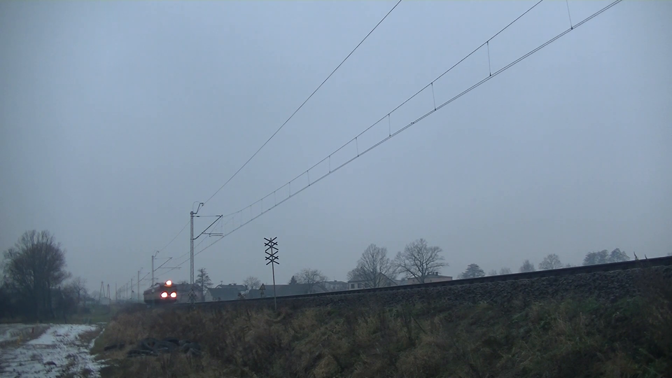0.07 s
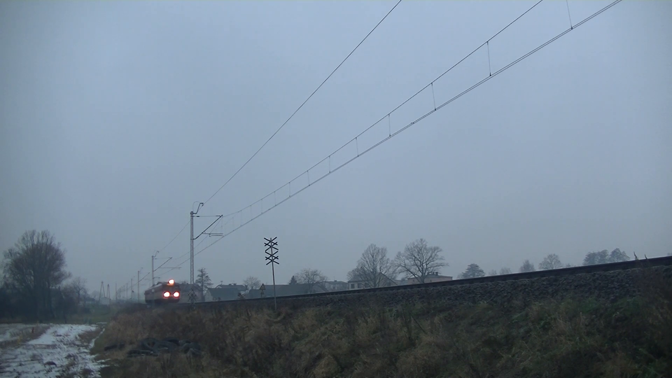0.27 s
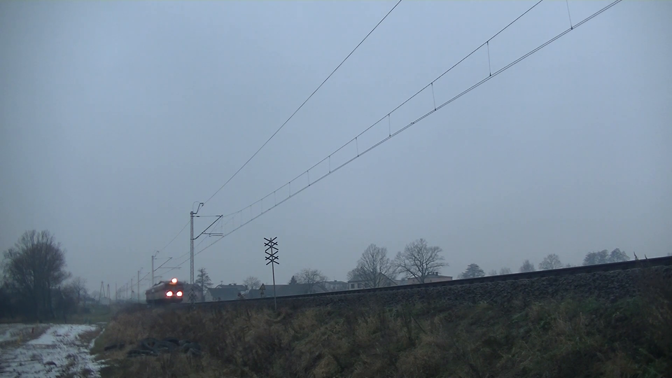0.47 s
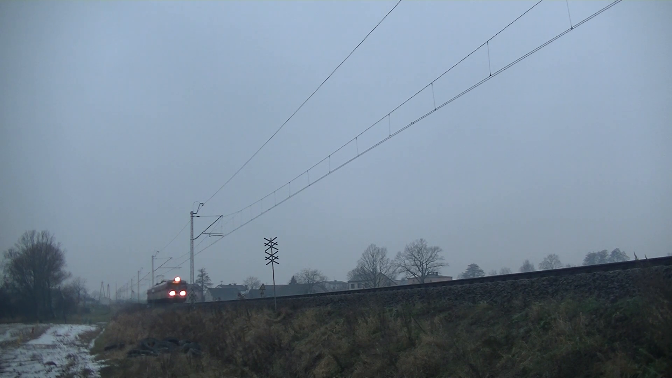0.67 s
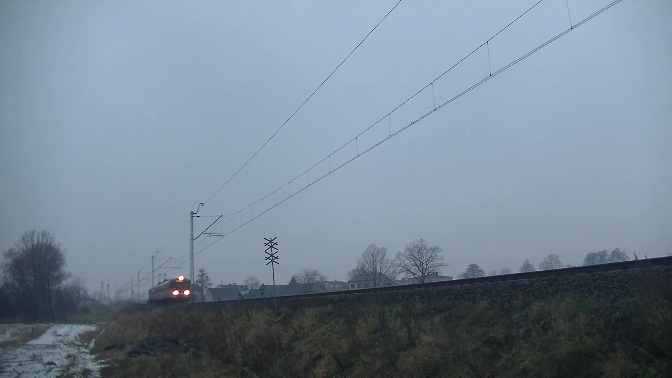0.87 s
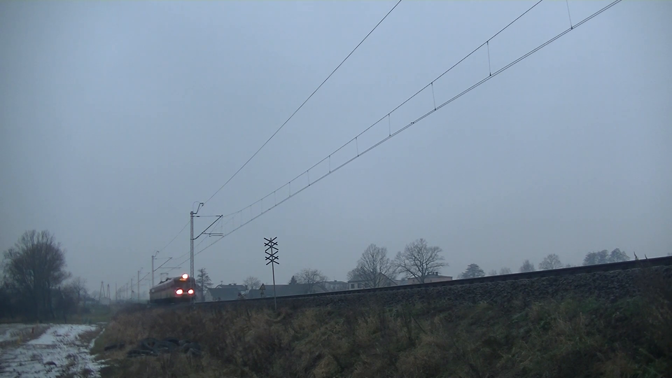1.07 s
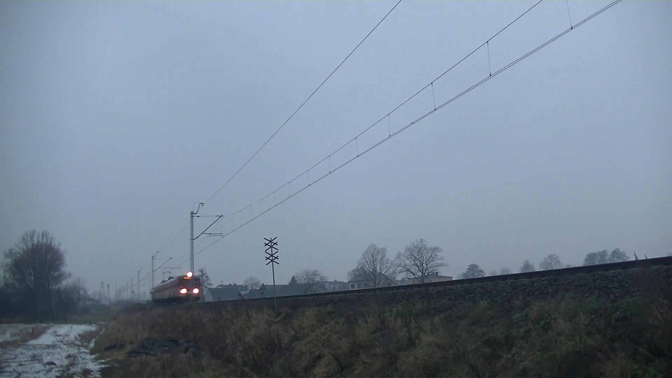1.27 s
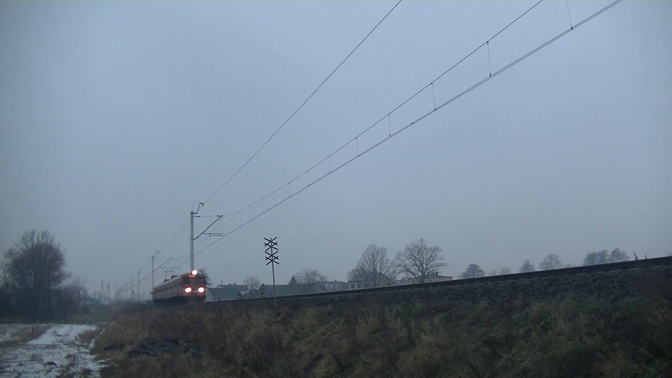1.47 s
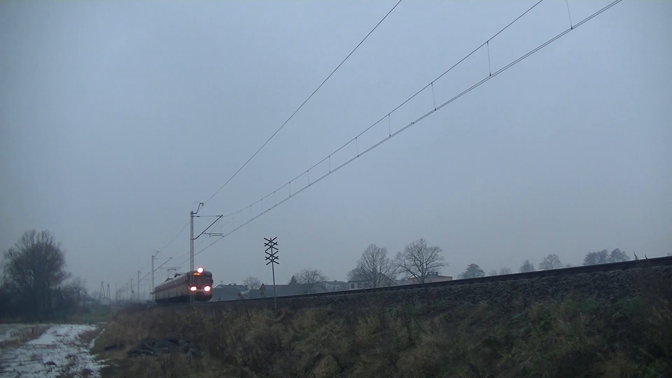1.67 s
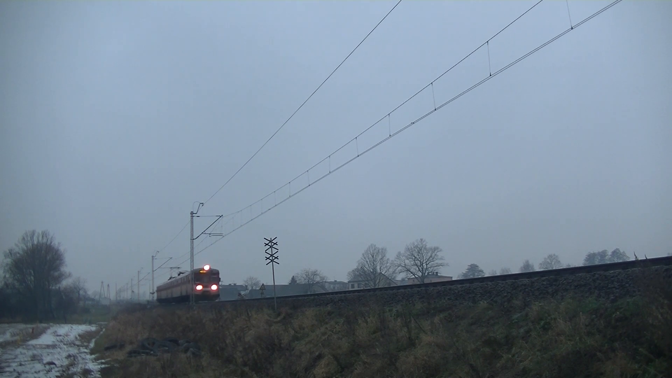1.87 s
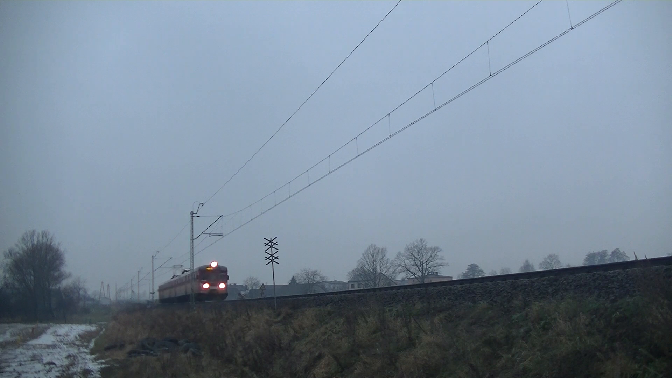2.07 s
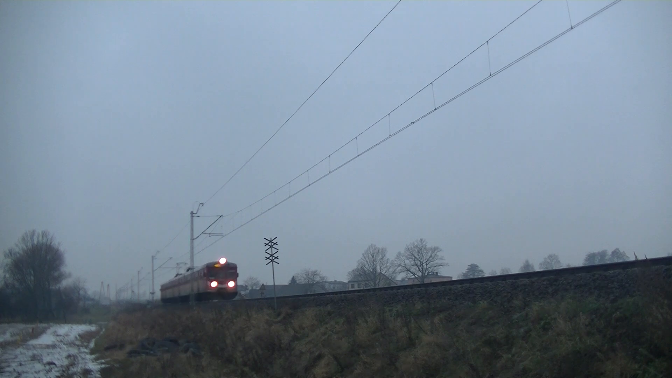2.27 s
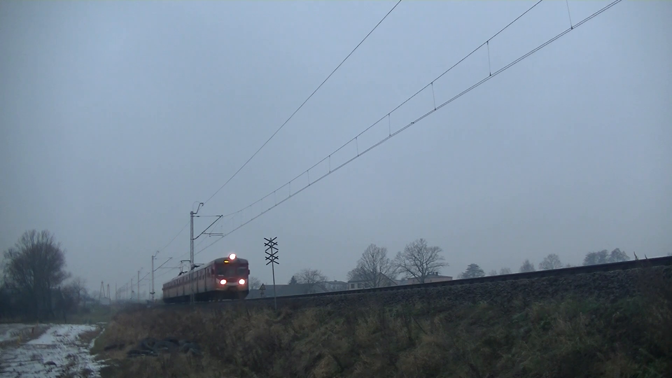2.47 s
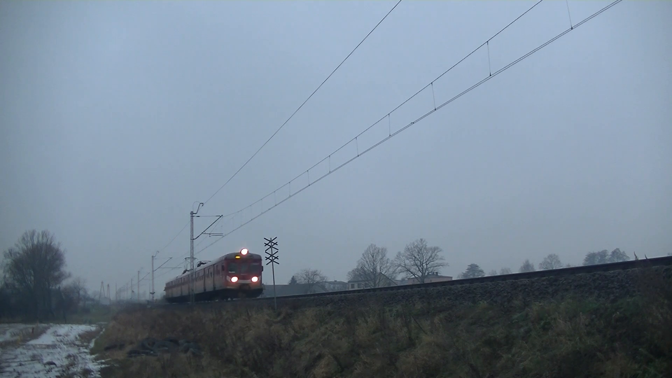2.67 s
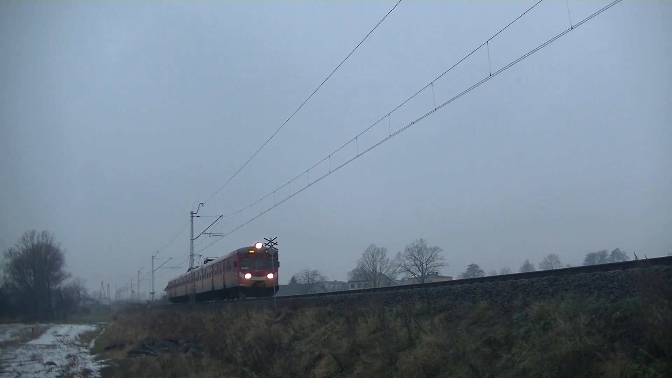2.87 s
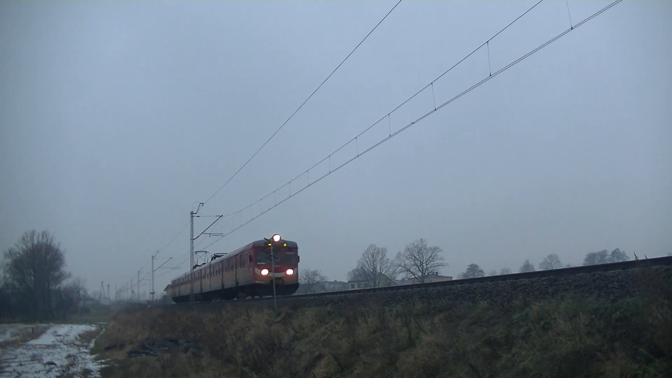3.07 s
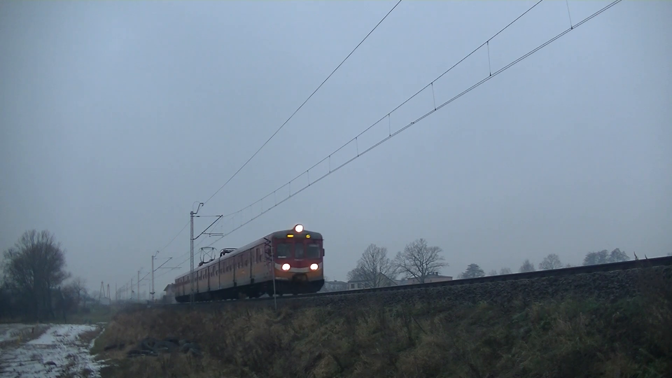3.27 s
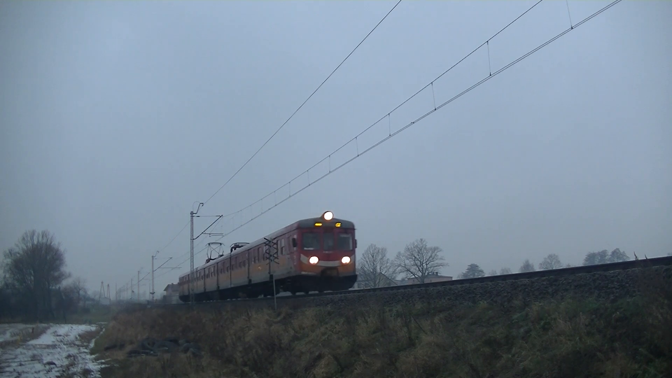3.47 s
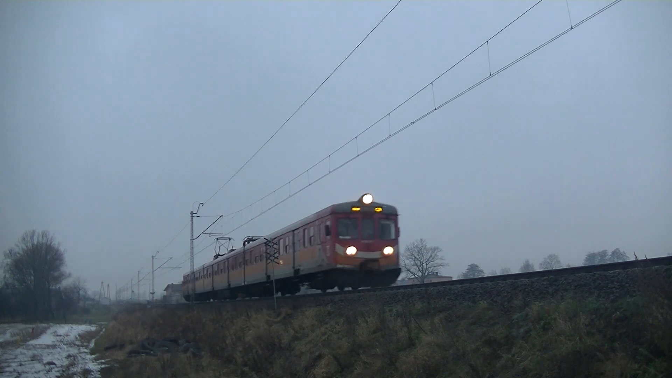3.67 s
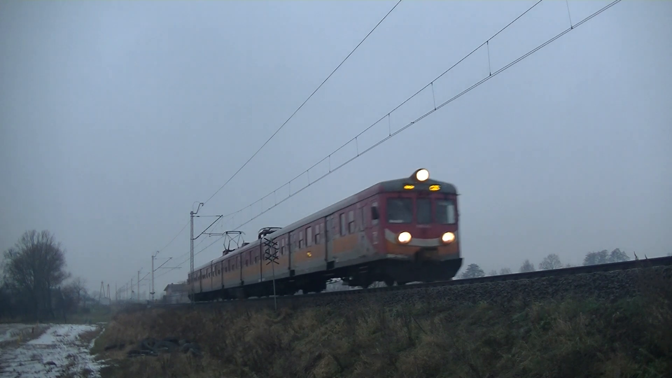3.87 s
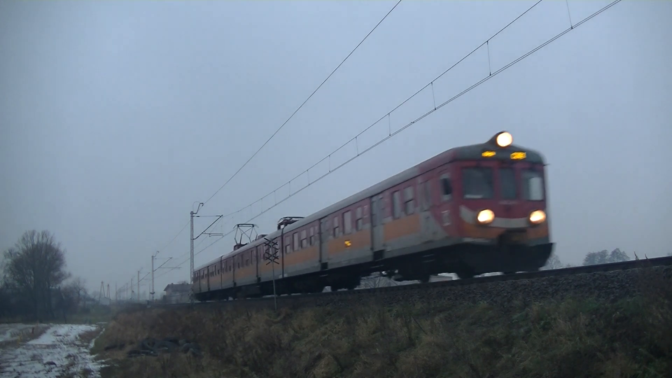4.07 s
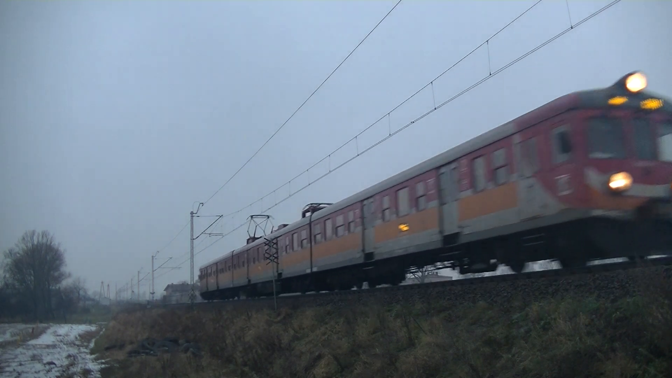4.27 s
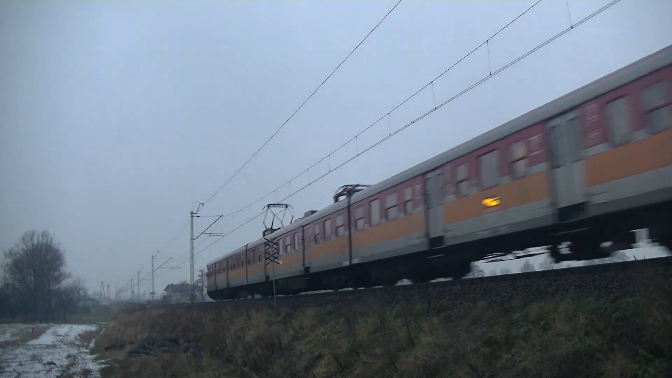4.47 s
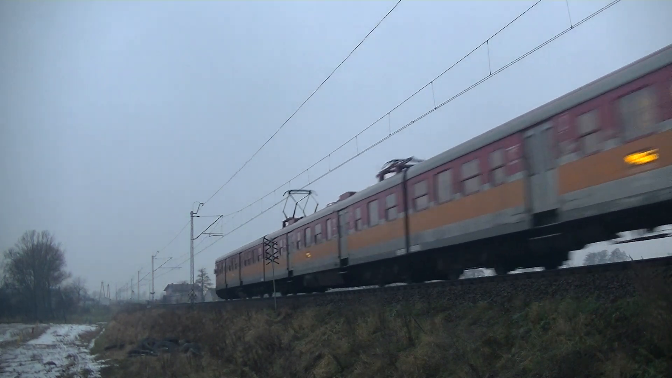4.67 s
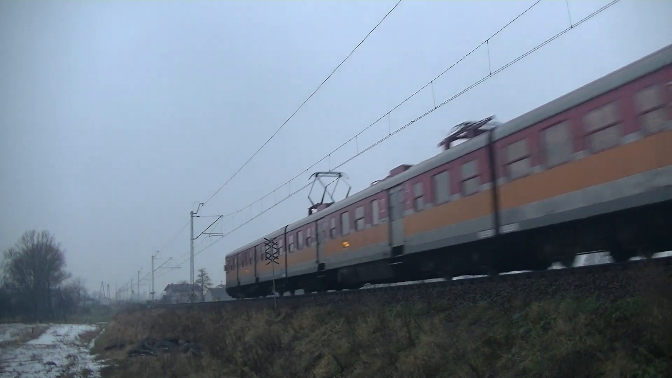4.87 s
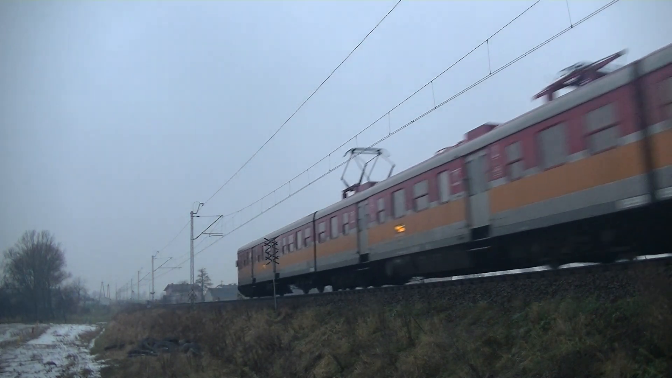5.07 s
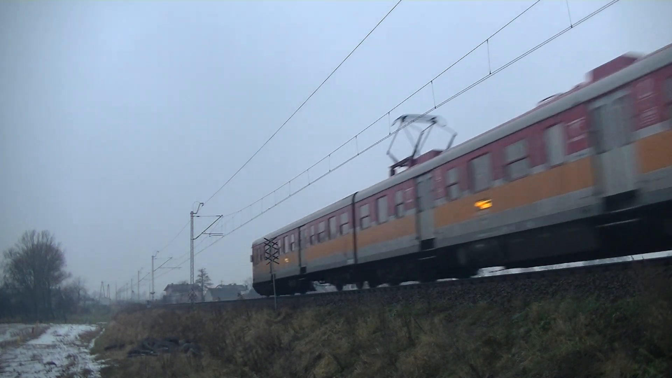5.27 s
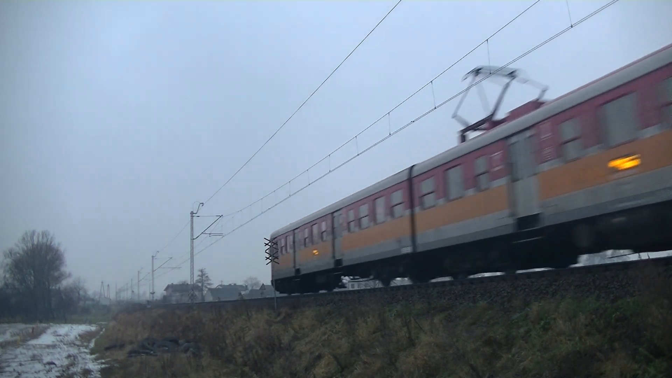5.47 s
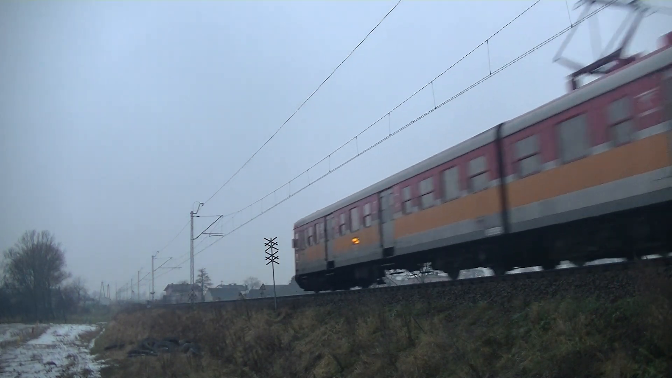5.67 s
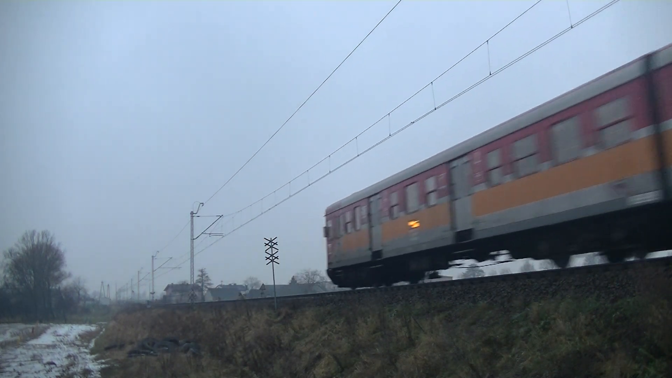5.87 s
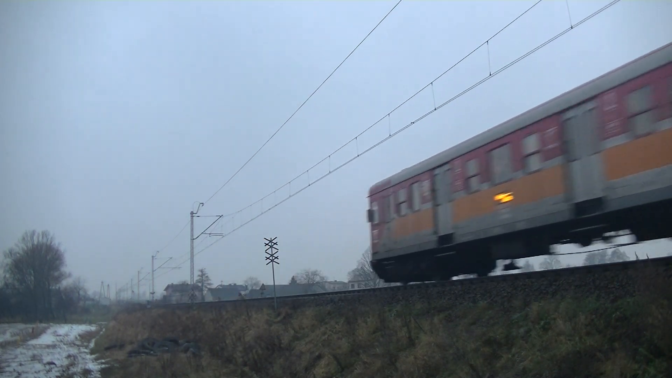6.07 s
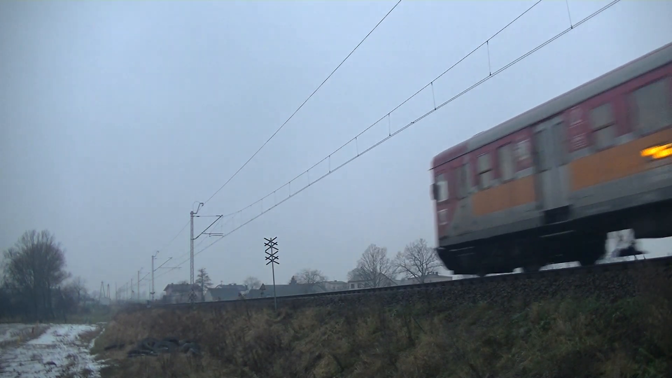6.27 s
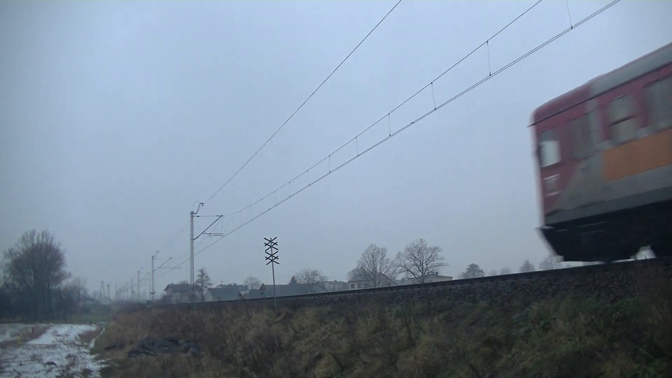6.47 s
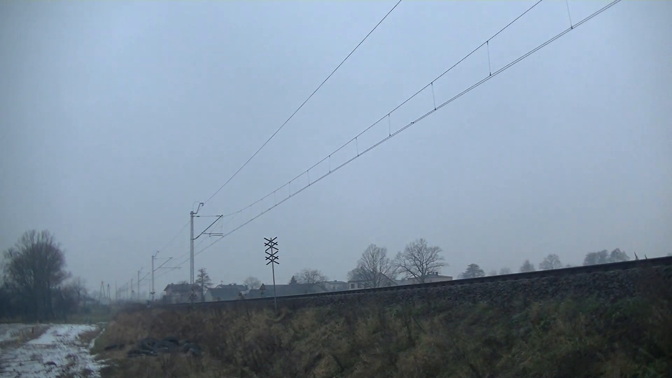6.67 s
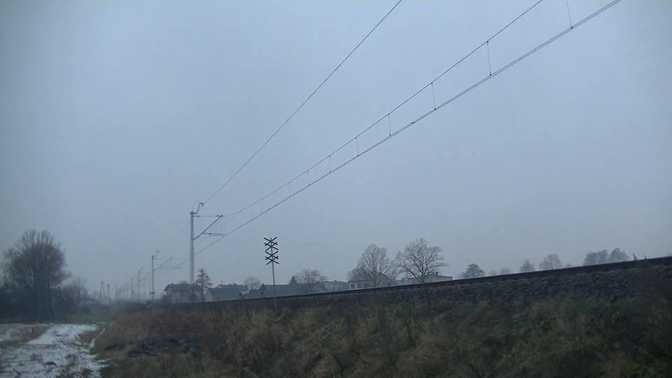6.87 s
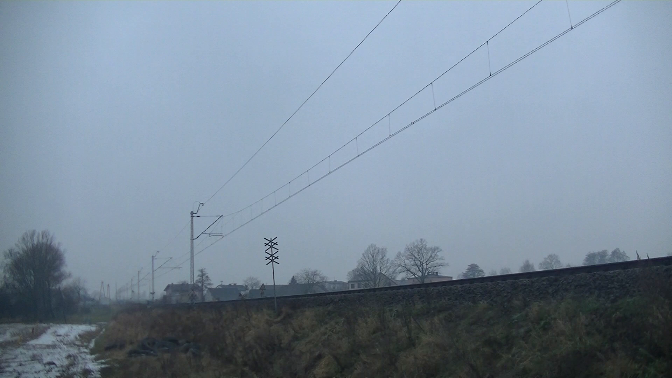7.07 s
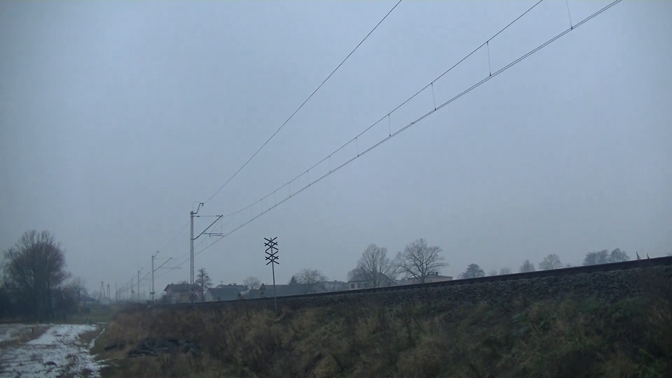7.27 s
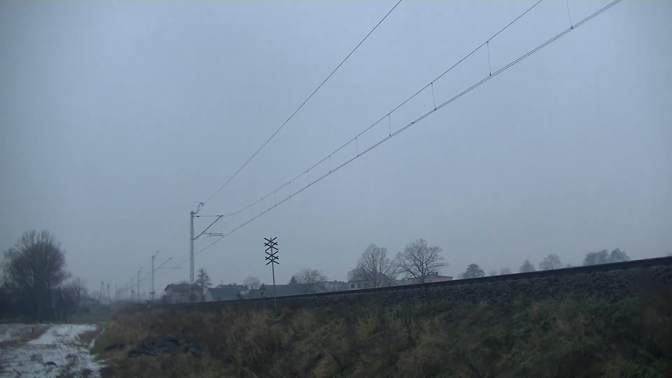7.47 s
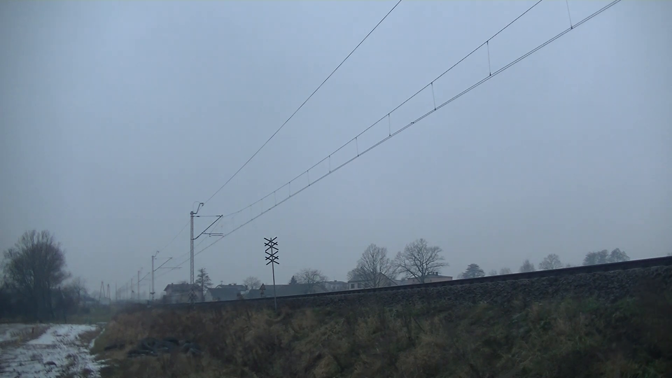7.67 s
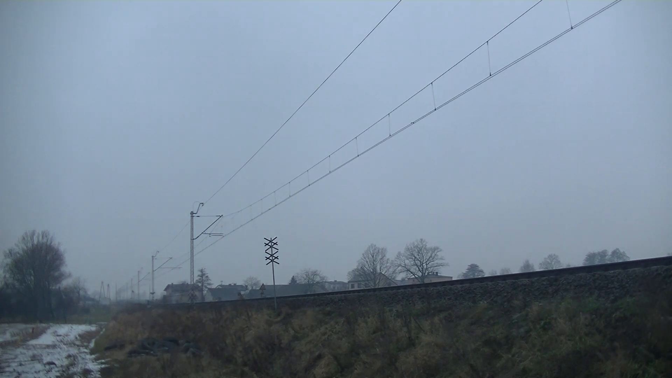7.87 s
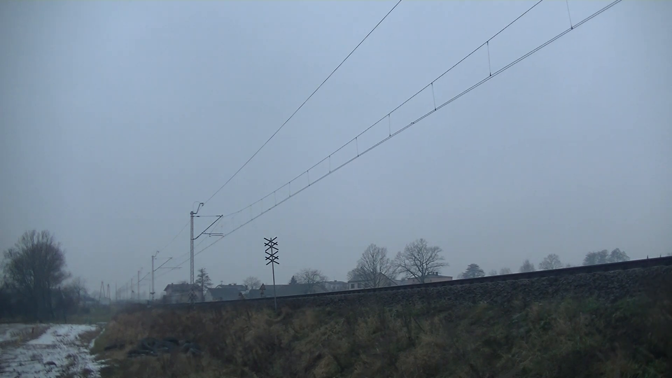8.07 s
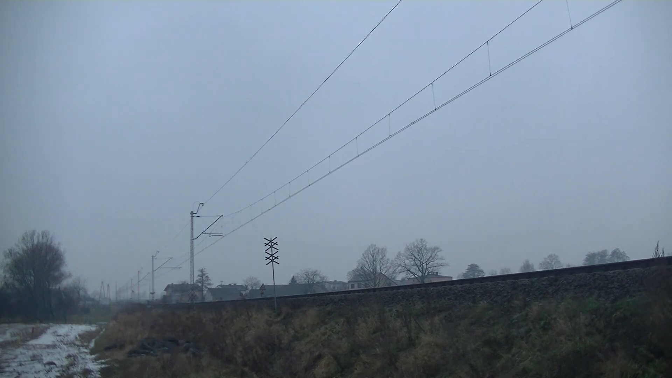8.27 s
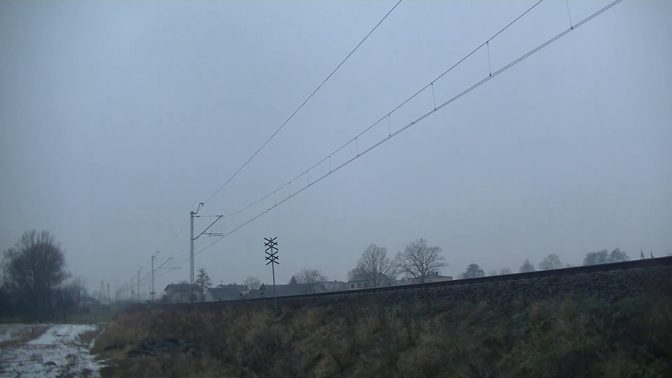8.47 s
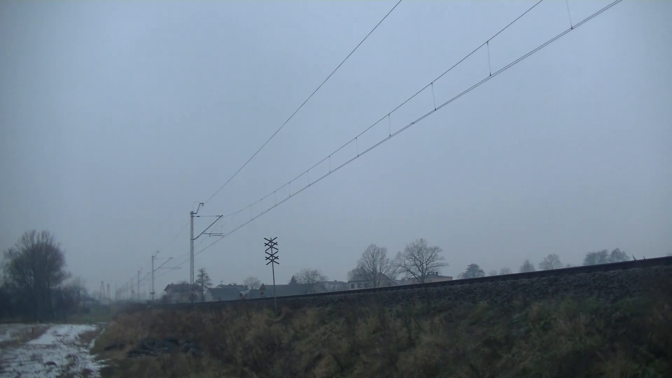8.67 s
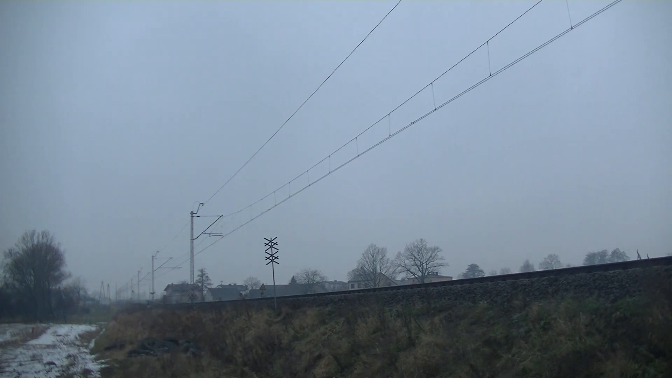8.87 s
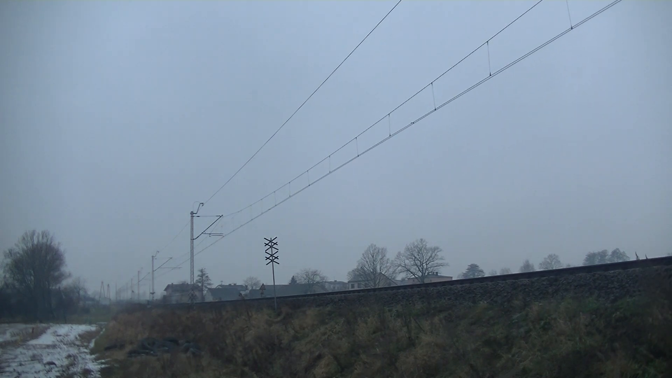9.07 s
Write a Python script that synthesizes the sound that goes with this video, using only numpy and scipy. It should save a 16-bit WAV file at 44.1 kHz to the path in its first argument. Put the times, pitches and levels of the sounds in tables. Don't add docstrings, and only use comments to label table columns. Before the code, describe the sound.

Faint metallic rail hiss swells into a harsh, bright wheel roar as a train sweeps by outdoors, then falls away abruptly into quiet rumble.

```python
import sys
import numpy as np
from scipy import signal
from scipy.io import wavfile
from scipy.ndimage import uniform_filter1d

SR = 44100
rng = np.random.default_rng(int(sys.argv[2]) if len(sys.argv) > 2 else 0)


def log_audio(samples):
    frames = np.atleast_2d(samples).T
    limited = np.clip(frames, -1, 1)
    pcm = np.round(limited * 32767).astype(np.int16)
    wavfile.write(sys.argv[1], SR, pcm)


def gain_from_db(level_db):
    decades = np.asarray(level_db, float) / 20
    return 10 ** decades


N = 402633
FRAME = 2048

# (time [s], bearing [0 ahead, 1 abreast, 2 past the shoulder])
BEARING = [(0, 0.33), (1.6, .1), (2.5, 0.015), (3.7, 0.081), (4.3, 0.58), (4.7, .73), (5.15, 0.88),
           (5.65, 1.27), (6.0, .8), (6.4, 1.13), (6.75, 0.96), (7.2, 1.42), (7.45, 2), (9.13, 0.85)]
# (frequency [Hz], level [dB per Hz], left minus right [dB], left lead [rad], likeness of the ports [0-1])
PORTS_AHEAD = [(60, -28.9, -1.8, -0.18, 0.92), (250, -22.1, -4.6, 0.02, 0.72),
               (700, -14.2, -3.8, 0.32, 0.96), (1500, -2.7, 0.8, 0.73, 0.85), (2700, 0.0, 3.4, 0.18, 0.72),
               (4000, -0.3, -2.3, 0.29, 0.95), (4800, -8.4, -3.9, 0.26, 0.72),
               (5350, -9.9, -4.8, 1.5, 0.21), (5900, -13.8, 3.0, 0.05, 0.52),
               (7800, -20.6, 4.2, -0.94, 0.76), (8700, -29.2, -4.8, -1.7, 0.37),
               (10700, -35.2, 0.7, -0.89, 0.15), (11300, -33.9, 1.0, -2.74, 0.5),
               (15600, -41.3, -1.2, -2.69, 0.27)]
PORTS_ABREAST = [(60, -33.8, -1.3, -0.04, 0.99), (250, -19.7, -5.4, -0.05, 0.99),
                 (800, -12.0, -3.9, -0.02, 0.99), (1500, -4.6, -3.1, -0.15, 0.85),
                 (2700, -2.1, -7.2, -0.45, 0.72), (4100, 0.0, -2.4, -0.25, 0.93),
                 (4700, -5.5, -1.4, -0.83, 0.65), (5400, -7.9, -8.5, -0.98, 0.34),
                 (6600, -14.7, -2.8, -0.72, 0.77), (7500, -17.9, -1.4, -1.44, 0.65),
                 (8800, -26.2, -8.0, -1.26, 0.48), (10400, -33.7, 0.0, -0.07, 0.67),
                 (11200, -34.9, -1.3, -2.1, 0.3), (15600, -43.2, -2.3, -2.2, 0.38)]
PORTS_BEHIND = [(60, -23.9, -1.2, -0.24, 0.83), (250, -9.2, -4.6, -0.07, 0.91),
                (600, -8.6, -3.8, 0.12, 0.95), (1300, -0.4, -0.3, 0.15, 0.89),
                (2000, -1.2, 1.4, -0.2, 0.39), (3000, 0.0, 0.8, -1.73, 0.24),
                (4400, -4.3, 0.9, -2.54, 0.44), (5400, -4.6, -6.2, -3.23, 0.64),
                (6100, -12.8, -6.7, -2.5, 0.07), (7500, -19.3, -4.8, -2.81, 0.12),
                (8700, -28.3, -3.4, -0.68, 0.26), (10200, -33.8, 0.1, -0.26, 0.22),
                (12000, -36.3, -0.7, -2.45, 0.11), (15600, -41.7, -1.8, -3.76, 0.02)]
# (frequency [Hz], width [Hz], level over the roar [dB])
WHEEL_RINGS = [(920, 80, -35), (1695, 27, 5), (271, 16, 1.5)]
# (frequency [Hz], width [Hz], level [dB])
TRACK = [(60, 40, -0.5), (200, 143, -9), (270, 23, 3.5), (400, 25, 2), (700, 126, -2), (1140, 200, -2.5),
         (1450, 152, -3.5), (1845, 500, -0.5)]
# (frequency [Hz], width [Hz], level over the roar [dB])
HOUSING = [(5360, 55, 1), (5620, 82, 8.5), (7020, 450, 2.5), (9540, 60, 8.5), (13020, 80, 5),
           (14200, 300, 2)]
# (frequency [Hz], width [Hz], level over the roar [dB])
PORT_RING = (3900, 800, -1)
# (time [s], length [s], frequency [Hz], width [Hz], level over the roar [dB])
HUMS = [(3.79, 0.043, 1740, 80, 12), (5.2, 0.32, 740, 35, -1), (4.3, 0.077, 850, 220, -21),
        (5.748, 0.058, 150, 91, 6), (5.1, 0.13, 65, 300, 5), (2.25, 1, 2370, 230, 1.5),
        (7.8, 0.088, 700, 370, 8), (7.324, 0.21, 660, 330, 6.5), (7.35, 0.23, 408, 67, 12.5),
        (7.94, 1.07, 182, 37, 16), (0.25, 1, 1280, 600, 1), (5.14, 0.23, 4100, 500, -1),
        (6.7, 0.26, 5800, 700, -17), (5.9, 0.19, 5650, 1500, 3.5), (5.6, 1.6, 2300, 1100, 1.5),
        (4.86, 0.46, 373, 71, 6.5), (6.0, 0.17, 1660, 120, 4.5)]
# (frequency [Hz], width
# [Hz], level far off [dB], level drawing near [dB], level gone by [dB])
GROUND = [(80, 80, -4, 4, 3), (380, 114, -12, 0.5, -1), (602, 180, -5, -1, -1), (1170, 186, -6, -5, 0.5),
          (1680, 650, 3, -0.5, -3.5), (2300, 370, 2, -1, 0.5), (3500, 630, -4.5, 1, 0),
          (5780, 920, -3, -2, 0.5), (7350, 1600, 2, -3, 2.5), (11000, 3000, -5.5, 5.5, -15.5),
          (9700, 890, 5.5, 0.5, 11), (14000, 2500, 6, -7, -1)]
# (start [s], end [s])
DRAWS_NEAR_S = (1, 5.26)
# (time [s], level [dB])
ROAR = [(0, -40), (1.55, -38.5), (2.11, -33.5), (2.35, -32.5), (2.4, -30.5), (3.63, -24.5), (4.17, -16.5),
        (4.58, -15), (5.29, -15), (5.93, -17), (6.08, -16), (6.43, -17), (6.76, -16.5), (7.24, -20),
        (7.34, -23), (7.48, -33), (8.19, -36), (9.13, -40)]
# (level at full roar [dB], change per dB of roar [dB],
# gain as the train turns [dB], once behind [dB], in the wake of the tail [dB], over the far joint [dB],
# under a heavy bogie [dB], still in the mist [dB])
BALANCE = [
    (-33.5, -0.1543, 12, -1, 8.5, 1.8, 3, 1.5),
    (-19, -0.37, 9.5, -3, 7.5, 5.6, 2.5, 1.3),
    (0, 0, 0, 0, -1.5, 1, -0.5, -1),
    (-14, 0.04, 4.5, -4, 6, 0.82, 1.5, -7),
]
BAND_HZ = np.array([60, 450, 1500, 5000, 9000])
# (time [s], span [s], weight [0-1])
BOGIES = [(2.24, 0.075, 0.5), (3.45, 0.23, 0.6), (4.72, 0.18, 1), (5.12, .1, 0.74), (5.45, 0.16, 0.9),
          (5.87, 0.28, 1.2), (6.35, 0.22, 0.27), (7.08, .12, .9)]
# (frequency [Hz], level [dB per Hz])
SELF_NOISE = [(40, -102), (150, -89.5), (400, -100), (2000, -104), (8000, -105), (12000, -106),
              (15800, -109)]
# (time [s], length [s], frequency [Hz], peak level [dB])
FLANGE = [(1.703, .24, 1712, -40.5), (1.888, .07, 1710, -40), (2.043, .05, 1720, -39),
          (2.299, 0.061, 1710, -40), (2.418, .1, 1720, -39), (2.703, 0.22, 1695, -51),
          (3.003, .1, 1690, -38), (3.221, .17, 1690, -38), (3.404, .07, 1716, -31)]
# (time [s], peak level [dB], frequency [Hz])
DRIP = [
    (2.074, -28, 1160),
]
# (time [s], length [s], frequency [Hz], peak level [dB])
GEARS = [(4.503, 0.17, 280, -48), (4.722, 0.19, 762, -37), (7.32, 0.077, 700, -33),
         (4.718, .18, 378, -40.5), (5.3, 0.2, 279, -43), (6.0, .15, 345, -41.5), (6.27, .27, 238, -44),
         (8.006, 0.21, 226, -56)]

TAIL_S = (7.22, 7.44)
BEND_S = 1.59


def to_frames(x):
    return signal.stft(x, SR, nperseg=FRAME, noverlap=3 * FRAME // 4)


def to_sound(z):
    return signal.istft(z, SR, nperseg=FRAME, noverlap=3 * FRAME // 4)[1][..., :N]


def on_log(hz, table):
    at, *columns = np.transpose(table)
    return [np.interp(np.log(hz + 1), np.log(at), c)[:, None] for c in columns]


def bump(hz, centre_hz, width_hz):
    return np.exp(-0.5 * (2 * (hz[:, None] - centre_hz) / width_hz) ** 2)


def peak(hz, centre_hz, width_hz, db):
    return gain_from_db(2 * db) / (1 + (2 * (hz[:, None] - centre_hz) / width_hz) ** 2)


def patches(shape, tall, long):
    x = rng.standard_normal(shape)
    for _ in range(2):
        x = uniform_filter1d(x, max(int(tall), 1), axis=0)
        x = uniform_filter1d(x, max(int(long), 1), axis=1)
    return x / x.std()


def turning(s):
    return np.tanh((s - 5.91) / 2.06)


def motion(s):
    bearing = np.interp(s, *np.transpose(BEARING))
    past_shoulder = np.clip(bearing - 1, 0, 0.41)
    tail_gone = np.interp(s, TAIL_S, [0, 0.91])
    behind = np.clip(np.maximum(past_shoulder, tail_gone), 0, 1)
    fading_db = -2.5 * np.maximum(s - 4.4, 0)
    straight_db = -18 * np.clip((BEND_S - s) / 0.08, 0, 1)
    return bearing, behind, 1.5 + fading_db + straight_db


def ports(hz, bearing, behind):
    columns = zip(on_log(hz, PORTS_AHEAD), on_log(hz, PORTS_ABREAST), on_log(hz, PORTS_BEHIND))
    blends = ((1 - behind) * (a + bearing * (b - a)) + behind * c for a, b, c in columns)
    db, side_db, lead, like = blends
    power = gain_from_db(2 * db) / (gain_from_db(side_db) + gain_from_db(-side_db))
    like = np.clip(like, 0.01, 0.99) ** (0.5 + 0.5 * behind)
    return power * gain_from_db(side_db), power * gain_from_db(-side_db), like * np.exp(1j * lead)


def ground_db(hz, s, bearing, behind):
    far = np.interp(s, DRAWS_NEAR_S, [1, 0])
    near = (1 - far) * np.clip(1 - bearing, 0, 1)
    return sum(bump(hz, f, w) * (a * far + b * near + c * behind) for f, w, a, b, c in GROUND)


def resonances(hz, s, bearing, behind, ring_db):
    shift = 0.901 - 0.11 * turning(s)
    rings = sum(peak(hz, f * shift, w, db + ring_db) for f, w, db in WHEEL_RINGS)
    track_db = sum(db * bump(hz, f * shift, w) for f, w, db in TRACK)
    housing = sum(peak(hz, f, w, db) for f, w, db in HOUSING)
    housing = housing * np.clip(1.7 - 3 * bearing, 0, 1)
    port_ring = peak(hz, *PORT_RING) * (1 - behind)
    hums = 0
    for at, length, f, w, db in HUMS:
        passing = np.exp(-0.5 * (2 * (s - at) / length) ** 2)
        hums = hums + peak(hz, f, w, db) * passing
    colour_db = track_db + ground_db(hz, s, bearing, behind)
    return (1 + rings + housing + port_ring + hums) * gain_from_db(2 * colour_db)


def balance(s, behind):
    roar_db = np.interp(s, *np.transpose(ROAR)) + 15
    going = (1 + turning(s)) / 2
    wake = np.interp(s, TAIL_S, [0, 1]) * np.exp(-np.maximum(s - TAIL_S[1], 0) / 0.54)
    joint = np.clip((s - 8.945) / 0.03, 0, 1)
    motors = sum(weight * np.exp(-((s - at) / span) ** 2) for at, span, weight in BOGIES)
    mist = np.exp(-s / 0.52)
    causes = [1 + 0 * s, roar_db, going, behind, wake, joint, motors, mist]
    return np.array(BALANCE) @ np.array(causes)


def train():
    hz, s, (first, second) = to_frames(rng.standard_normal((2, N)))
    bearing, behind, ring_db = motion(s)
    left, right, like = ports(hz, bearing, behind)
    body = resonances(hz, s, bearing, behind, ring_db)
    swell_db = 0.47 * patches(body.shape, 30, 4.2) + 0.35 * patches(body.shape, 150, 2)
    body = body * gain_from_db(2 * swell_db)

    middle = body * (left + right + 2 * np.sqrt(left * right) * like.real) / 4
    bands = zip(BAND_HZ[:-1], BAND_HZ[1:])
    have = [middle[(hz >= lo) & (hz < hi)].sum(0) / (FRAME / 2) for lo, hi in bands]
    have_db = 10 * np.log10(uniform_filter1d(np.array(have), size=9, axis=1))
    trim_db = balance(s, behind) - have_db
    place = np.interp(np.log(hz + 1), np.log([300, 1000, 2600, 6200]), np.arange(4))
    tilt_db = sum(np.clip(1 - np.abs(place[:, None] - k), 0, 1) * trim_db[k] for k in range(4))

    air_db = 3 * bump(hz, 14700, 3200)
    gain = np.sqrt(body) * gain_from_db(tilt_db + air_db)
    partly_shared = like.conj() * first + np.sqrt(1 - np.abs(like) ** 2) * second
    pair = np.array([np.sqrt(left) * first, np.sqrt(right) * partly_shared])
    roar_db = np.interp(np.arange(N) / SR, *np.transpose(ROAR))
    return to_sound(gain * pair) * gain_from_db(roar_db)


def self_noise():
    hz, _, z = to_frames(rng.standard_normal((2, N)))
    return to_sound(z * gain_from_db(on_log(hz, SELF_NOISE)[0]) * np.sqrt(SR / 2))


def add_tone(out, at, length, hz, db, sag_per_s, side_db):
    t = np.arange(-int(length * SR), int(length * SR)) / SR
    wobble_hz = 900 * uniform_filter1d(rng.standard_normal(SR), size=3000)[:len(t)] * hz / 1700
    pitch_hz = hz * (1 + sag_per_s * t) + wobble_hz
    tone = np.sin(2 * np.pi * np.cumsum(pitch_hz) / SR) * np.exp(-(2 * t / length) ** 4)
    tone *= gain_from_db(90 * uniform_filter1d(rng.standard_normal(SR), size=900)[:len(t)])
    start = int((at - length) * SR)
    out[:, start:start + len(t)] += tone * gain_from_db(db + np.array([[side_db], [-side_db]]) / 2)


def flange_whistles():
    out = np.zeros((2, N))
    for at, length, hz, db in FLANGE:
        add_tone(out, at, length, hz, db, sag_per_s=-0.007, side_db=8 - 3.5 * (at - BEND_S))
    return out


def drip():
    out = np.zeros(N)
    t = np.arange(2000) / SR
    for at, db, hz in DRIP:
        notes = np.sin(2 * np.pi * hz * t) + 0.9 * np.sin(2 * np.pi * 1.4 * hz * t)
        knock = notes * np.exp(-t / 0.0021) * (1 - np.exp(-t / 0.00067))
        out[int(at * SR):][:len(t)] += gain_from_db(db) * knock * 2.6
    return out * gain_from_db(np.array([[-1.5], [1.5]]))


def gear_whines():
    out = np.zeros((2, N))
    for at, length, hz, db in GEARS:
        add_tone(out, at, length, hz, db, sag_per_s=-0.097, side_db=-5)
    return out


def scene():
    return train() + self_noise() + flange_whistles() + drip() + gear_whines()


def roll_off(x):
    return signal.sosfilt(signal.butter(12, 15820, fs=SR, output="sos"), x)


def record(dry):
    trimmed = signal.sosfilt(signal.butter(2, 32, "high", fs=SR, output="sos"), dry)
    rounded = np.tanh(0.6 * trimmed) / 0.6
    return roll_off(rounded)


dry = scene()
out = record(dry)
log_audio(out)
```